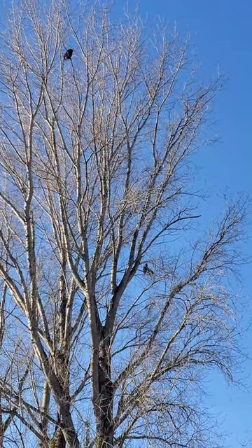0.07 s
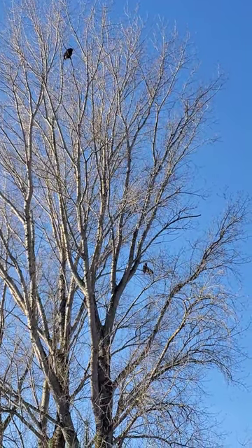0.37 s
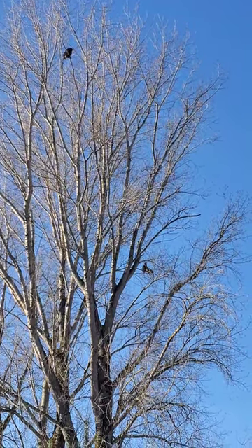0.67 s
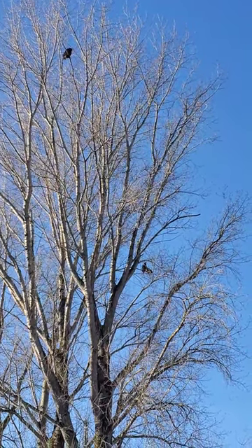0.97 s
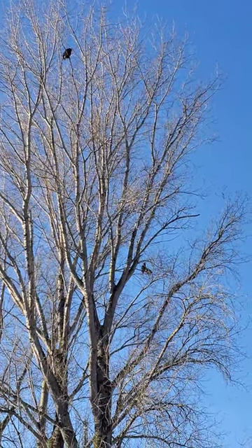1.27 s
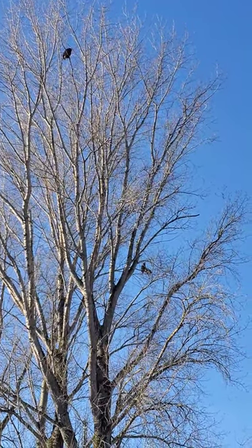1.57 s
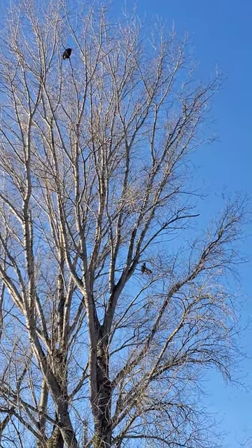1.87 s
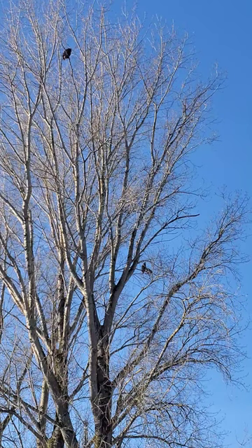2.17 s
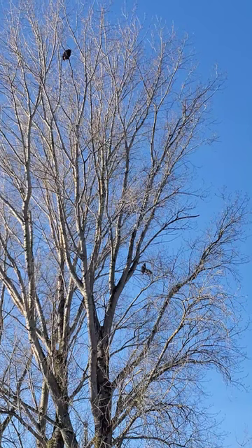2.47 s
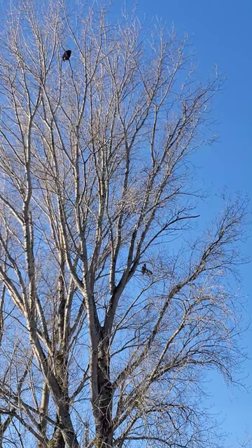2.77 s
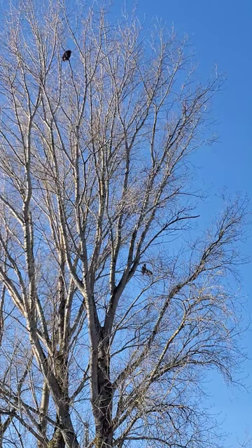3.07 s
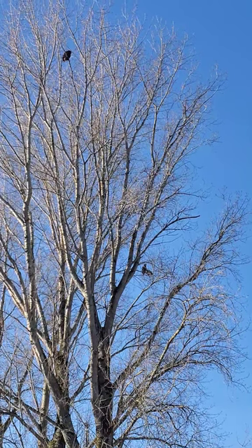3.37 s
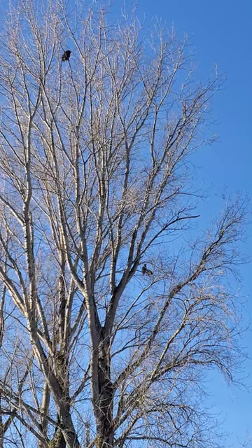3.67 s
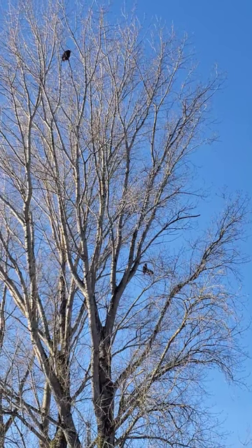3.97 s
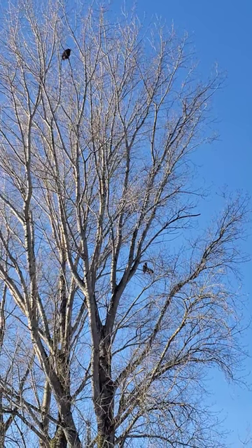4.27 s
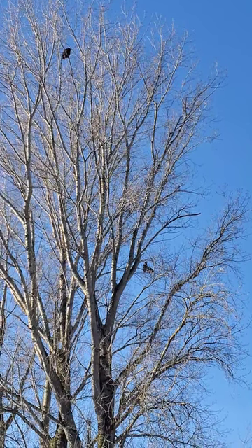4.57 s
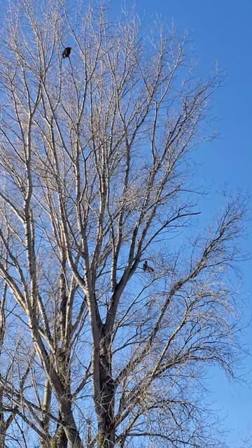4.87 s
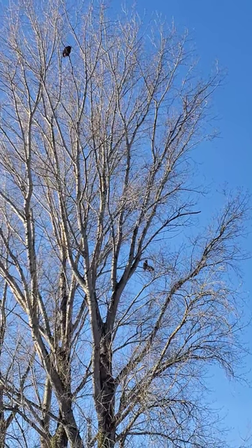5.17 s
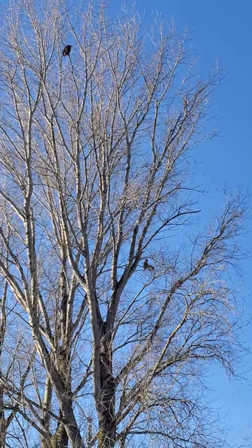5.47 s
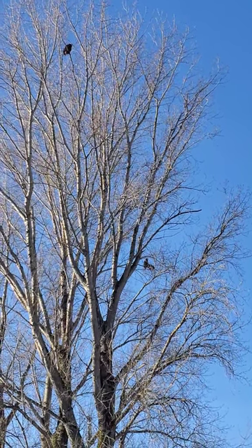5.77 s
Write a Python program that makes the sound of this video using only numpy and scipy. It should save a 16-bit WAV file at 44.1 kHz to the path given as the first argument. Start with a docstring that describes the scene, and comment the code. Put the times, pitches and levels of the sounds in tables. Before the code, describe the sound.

A distant road rumbles steadily outdoors. Faint birds in the trees give thin whistles and two rising, wheezy calls, then a high twitter. Small chirps cluster as the traffic swells slightly, followed by a third wheeze and more whistles and chirps. Near the end a fingertip suddenly bumps and brushes the microphone on the right, much louder than the birds, and one lower whistle follows.

```python
"""A distant road rumbles throughout, and bare winter trees scatter the calls of birds.
First come thin whistles and two rising, wheezy calls from the two sides of a bird's voice box,
then a high twitter. Small arched chirps crowd in as traffic swells past, near 2.6 s.
A third wheeze follows at 3.5 s, then more whistles and chirps. At 5.6 s a fingertip bumps
the camera and brushes across its right microphone opening; one lower whistle ends the scene."""
import sys
import numpy as np
from scipy import signal
from scipy.fft import rfft, irfft, next_fast_len
from scipy.io import wavfile
from scipy.ndimage import uniform_filter1d, map_coordinates

SR = 44100
rng = np.random.default_rng(int(sys.argv[2]) if len(sys.argv) > 2 else 0)


def inscribe(sig):
    """Save sig as 16-bit PCM at rate SR to the path in sys.argv[1].

    A 1-D sig is mono; a 2-D sig holds one channel per row.
    Samples are clipped to [-1, 1] before scaling.
    """
    pcm = np.round(np.clip(np.atleast_2d(sig).T, -1, 1) * 32767)
    wavfile.write(sys.argv[1], SR, pcm.astype(np.int16))


N = 261072

# Tone colour of the steady hiss of air and microphones: frequency_hz, relative_db
HISS_COLOUR = [(1500, -11), (3000, 3), (3800, 3), (4600, 3.5), (5700, 1), (6800, -11), (8200, -17),
               (9500, -7), (11000, -2), (15000, -4)]
# Tone colour of the deep engine rumble: frequency_hz, relative_db
RUMBLE_COLOUR = [(20, -22), (33, -11.5), (43, -5), (55, 0.5), (72, -0.5), (88, -1.5), (110, -8),
                 (145, -19.5), (220, -45), (500, -100)]
# Tone colour of the engine hum above it: frequency_hz, relative_db
HUM_COLOUR = [(80, -17), (135, 1.5), (195, 0), (240, -5.5), (310, -8.5), (450, -17.5), (750, -35.5),
              (2000, -92)]
# Tone colour of the tyre roar: frequency_hz, relative_db
TYRE_COLOUR = [(200, -6), (400, -1.5), (620, -2), (800, 1.5), (1050, 0.5), (1550, -4), (2000, -4.5),
               (2300, -11.5), (2650, -24), (3600, -39.5), (6000, -37.5)]
# Droning engine tones: pitch_hz, level_db
ENGINE_TONES = [(59, -57.5), (71, -53), (180, -65.5), (211, -71), (274, -79)]
# How alike left and right are in sound from all around: frequency_hz, likeness (-1 to 1)
STEREO_LIKENESS = [(60, 0.99), (130, 0.96), (290, 0.78), (640, 0.69), (1410, 0.36), (3100, -0.22),
                   (6820, -0.41), (15000, 0.55)]
# Tone colour of a blur of far-off songs: frequency_hz, relative_db
CHORUS_COLOUR = [(1500, -51.5), (2800, -9), (3250, 0), (3700, -11), (4600, -5.5), (5400, -14), (7000, -21),
                 (9000, -74)]
# How loud that blur is: time_s, level_db
CHORUS_LEVELS = [(0, -83.5), (1.6, -77.5), (2.3, -90), (3.4, -94), (4.15, -75), (4.7, -77.5), (5.1, -86),
                 (5.55, -76.5), (5.9, -93)]
# High twitter: first_note_s, last_note_s, first_pitch_hz, last_pitch_hz, level_db
TWITTER_PHRASES = [(1.355, 1.999, 6780, 5950, -84.5), (5.595, 5.74, 7650, 6740, -80.5)]
# Arched chirps: start_s, length_s, top_pitch_hz, top_place (0 to 1), level_db
CHIRP_NOTES = [(1.045, 0.031, 4240, .9, -76.5), (1.284, .022, 3250, 0, -67), (2.42, .022, 2920, .1, -79),
               (2.6, 0.0845, 2630, .62, -75), (2.785, .022, 3300, 1, -83), (2.8, 0.082, 2304, 0.5, -66.5),
               (2.872, 0.036, 3250, 0.05, -78.5), (3.048, 0.069, 3410, 0.48, -77),
               (3.05, .06, 2910, 0.1, -73), (4.505, 0.062, 2216, 0.38, -62), (4.745, 0.062, 3410, .5, -77),
               (5.485, 0.035, 4650, .4, -74.5), (5.565, 0.08, 4800, .3, -77)]
# Thin whistles: start_s, length_s, pitch_hz, level_db
WHISTLE_NOTES = [(.14, 0.28, 3400, -80), (.44, .11, 3300, -83), (.62, 0.34, 3285, -90),
                 (.96, .08, 3520, -79), (1.07, .19, 3510, -76), (1.36, 0.35, 3413, -77),
                 (1.87, 0.22, 3380, -89.5), (3.99, .15, 3220, -76), (4.2, .16, 3235, -74),
                 (5.768, 0.12, 1703, -63.5)]
# Wheezy calls: start_s, length_s, base_pitch_hz, rise_hz, half_rise_s, swell_s, fade_db_per_s, level_db
WHEEZE_CALLS = [(0.279, 0.38, 1083, 399, .165, 0.21, 26, -76),
                (1.101, .48, 1021, 376, .185, 0.16, 23, -66.5),
                (3.541, 0.564, 1008, 344, .26, .13, 17, -66.5)]
# Overtones of a wheeze: pitch_multiple, relative_db
WHEEZE_OVERTONES = [(2, -8), (3, 0), (4, -14)]
# Tone colour of the hoarse air in a wheeze: frequency_hz, relative_db
RASP_COLOUR = [(1500, -21), (2300, -9), (3000, 0.5), (4200, 2.5), (5200, -11.5), (6500, -20), (9000, -36)]
# Time the echo in the trees takes to fade by 60 dB: frequency_hz, fade_s
TREE_ECHO = [(300, .4), (3000, .42), (8000, .25)]
# How each microphone opening (port) colours outdoor sound: frequency_hz, left_db, right_db
PORT_COLOUR = [(1130, 0, 0), (1720, -0.5, 7), (1870, -11.5, 5), (2230, 1.5, -0.5), (2530, -0.5, 4),
               (3200, -2.5, 4), (3780, -1.5, -4), (4530, -6.5, 6), (5470, -0.5, 1), (8000, 0.5, 0)]
# Tone colour of skin rubbing dully: frequency_hz, relative_db
RUB_COLOUR = [(40, -6), (100, 2.5), (280, -3.5), (450, -4), (750, -4), (1500, -7), (2500, -11.5),
              (5500, -20), (7500, -43), (15000, -49)]
# Tone colour of skin scraping: frequency_hz, relative_db
SCRAPE_COLOUR = [(400, -13), (1500, -10.5), (2400, -5), (3100, -1), (4000, -5.5), (5200, -10.5),
                 (6500, -15.5), (8500, -26), (12500, -16), (15500, -24)]


def amp(db):
    """Turn decibels into a number to multiply by."""
    return 10 ** (np.asarray(db) / 20)


def unit(x):
    """Scale x to an average strength (rms) of 1."""
    return x / np.sqrt(np.mean(x ** 2) + 1e-20)


def along(points, hz):
    """Read between the rows of a (frequency_hz, value) table, on a log frequency scale."""
    frequencies, values = np.transpose(points)
    return np.interp(np.log(hz + 1), np.log(frequencies + 1), values)


def gate(start, end, fade):
    """On from start to end, with soft edges; all in seconds."""
    t = np.arange(N) / SR
    return np.clip(np.minimum(t - start, end - t) / fade + .5, 0, 1)


def swell(peak_s, rise_db_per_s, fall_db_per_s):
    """A level in dB that climbs to 0 at peak_s and falls again."""
    t = np.arange(N) / SR - peak_s
    return np.minimum(rise_db_per_s * t, -fall_db_per_s * t)


def wobble(rate):
    """A smooth curve through `rate` random values a second."""
    return map_coordinates(rng.standard_normal(int(N * rate / SR) + 4), [np.arange(N) * rate / SR])


def filtered(x, response):
    """Turn each frequency of x up or down by response(hz)."""
    size = next_fast_len(N + SR // 2)
    return irfft(rfft(x, size) * response(np.fft.rfftfreq(size, 1 / SR)), size)[..., :N]


def noise(colour):
    """Noise of strength 1 with the given tone colour."""
    return unit(filtered(rng.standard_normal(N), lambda hz: amp(along(colour, hz))))


def rush(colour, patchy_db):
    """Noise from all around, with drifting louder patches; left and right are most alike in the bass."""
    bands = signal.stft(rng.standard_normal((2, N)), nperseg=1024)[2]
    patches = uniform_filter1d(rng.standard_normal(bands.shape[1:]), size=8, axis=0)
    patches = uniform_filter1d(patches, size=14, axis=1)
    pair = signal.istft(bands * amp(patchy_db * unit(patches)), nperseg=1024)[1][:, :N]
    spread = lambda hz: np.arccos(np.clip(along(STEREO_LIKENESS, hz), -1, 1)) / 2
    mid, side = filtered(pair, lambda hz: amp(along(colour, hz)) * [np.cos(spread(hz)), np.sin(spread(hz))])
    return unit(np.array([mid + side, mid - side]))


def hiss():
    """The faint steady hiss on each side, from the open air and the microphones."""
    return amp(-79) * np.array([noise(HISS_COLOUR), noise(HISS_COLOUR)])


def drone():
    """Engine tones that drift in and out with the air."""
    t = np.arange(N) / SR
    out = np.zeros(N)
    for hz, db in ENGINE_TONES:
        drift = wobble(5.9) + 1j * wobble(5)  # moves both level and phase
        out += amp(db) * unit(np.real(drift * np.exp(2j * np.pi * hz * t)))
    return out


def road(pass_s=2.6, pass_width_s=1.06, pass_db=2):
    """Far engines rumble and hum; tyre roar, dulled by distance, swells once as traffic passes."""
    t = np.arange(N) / SR
    rumble = amp(-44.5 + 0.6 * wobble(5.61)) * rush(RUMBLE_COLOUR, patchy_db=.5)
    hum = amp(-59) * rush(HUM_COLOUR, patchy_db=1.5)
    tyre_db = -63.5 + pass_db * np.exp(-((t - pass_s) / pass_width_s) ** 2)
    return rumble + hum + drone() + amp(tyre_db) * rush(TYRE_COLOUR, patchy_db=1.65)


def chorus():
    """Far-off songs blur into a noise that comes and goes."""
    level_db = np.interp(np.arange(N) / SR, *np.transpose(CHORUS_LEVELS))
    return amp(level_db) * rush(CHORUS_COLOUR, patchy_db=1)


def notes(rows, glide, jitter, flutter_db):
    """Pure bird notes: glide bends the pitch, jitter shakes it, flutter shakes the level."""
    out = np.zeros(N + SR)
    waver = 1 + jitter * wobble(200)
    flutter = amp(flutter_db * wobble(45))
    for start_s, length_s, hz, *shape, db in rows:
        progress = np.linspace(0, 1, int(length_s * SR))
        span = round(start_s * SR) + np.arange(len(progress))
        pitch = hz * glide(progress, length_s, *shape) * waver.take(span, mode="clip")
        loudness = np.sqrt(2 * np.abs(np.sin(np.pi * progress)))
        out[span] += amp(db) * loudness * np.sin(2 * np.pi * np.cumsum(pitch) / SR)
    return out[:N] * flutter


def arch(depth=0.167):
    """A glide that bends down on both sides of its top, by up to `depth` of the pitch."""
    return lambda progress, length_s, top: 1 - depth * ((progress - top) / max(top, 1 - top)) ** 2


def chatter(start_s=2.52, end_s=3.18, note_s=.04, pitch_hz=2640, level_db=-82.5, count=9):
    """Faint, farther chirps fill the busiest stretch at random."""
    rows = [(start_s + when * (end_s - start_s), note_s, pitch_hz * (1 + .244 * (high - .5)), top, level_db)
            for when, high, top in rng.random((count, 3))]
    return notes(rows, arch(), jitter=.02, flutter_db=2)


def twitter(gap_s=.09, slip_s=.018, note_s=.055):
    """Quick, high, loosely timed notes; each phrase holds its pitch, then drops."""
    rows = []
    for first_s, last_s, first_hz, last_hz, db in TWITTER_PHRASES:
        for progress in np.linspace(0, 1, round((last_s - first_s) / gap_s) + 1):
            late, high, loud = rng.standard_normal(3)
            start_s = first_s + progress * (last_s - first_s) + slip_s * late
            hz = (first_hz + (last_hz - first_hz) * progress ** 3) * (1 + .012 * high)
            rows.append((start_s, note_s, hz, rng.random(), db + 1.5 * loud))
    return notes(rows, arch(depth=.035), jitter=.016, flutter_db=2)


def chirps():
    """Short notes whose pitch bends in an arch."""
    return notes(CHIRP_NOTES, arch(), jitter=.011, flutter_db=1.5)


def whistles(sag_per_s=0.11):
    """Thin, nearly level notes that lose a small share of their pitch as they go."""
    sag = lambda progress, length_s: 1 - sag_per_s * length_s * (progress - .5)
    return notes(WHISTLE_NOTES, sag, jitter=.0035, flutter_db=1.5)


def wheezes():
    """Both sides of a bird's voice box rise in pitch together, a little apart, with hoarse air."""
    jitter, split = .0055, .055  # shares of the pitch
    swell_db, flutter_db, roughness_db, rasp_db, second_side_db = 12, 2, -6.5, -10, -5.5
    clearest_at, fray_db = .42, 9  # clearest partway through, hoarsest at the end
    out = np.zeros(N)
    for start_s, length_s, base_hz, rise_hz, half_rise_s, swell_s, fade_db_per_s, db in WHEEZE_CALLS:
        t = np.clip(np.arange(N) / SR - start_s, 0, length_s)
        pitch = base_hz + rise_hz * t ** 3 / (t ** 3 + half_rise_s ** 3)
        level_db = db + swell(start_s + swell_s, swell_db / swell_s, fade_db_per_s)
        hoarse_db = fray_db * ((t / length_s - clearest_at) / (1 - clearest_at)) ** 2
        voice = amp(rasp_db + hoarse_db) * noise(RASP_COLOUR)
        second_pitch = pitch * (1 + split * np.tanh(2 * wobble(7)))
        for side_hz, side_db in ((pitch, 0), (second_pitch, second_side_db + hoarse_db / 2)):
            waver = 1 + jitter * amp(hoarse_db) * wobble(220)
            phase = 2 * np.pi * np.cumsum(side_hz * waver) / SR
            for multiple, overtone_db in WHEEZE_OVERTONES:
                roughness = 1 + amp(roughness_db) * wobble(600)
                voice += amp(side_db + overtone_db) * np.sin(multiple * phase) * roughness
        loudness = amp(level_db + flutter_db * wobble(70))
        out += gate(start_s, start_s + length_s, fade=0.032) * loudness * voice
    return out


def among_trees(x, echo_db, left_db):
    """The direct sound plus its scatter from trunks and branches, different on each side."""
    hz, t, bands = signal.stft(rng.standard_normal((2, SR)), SR, nperseg=256)
    fading = amp(-60 * t / along(TREE_ECHO, hz)[:, None])
    echo = signal.istft(bands * fading, SR, nperseg=256)[1]
    scatter = signal.fftconvolve(x[None], echo / np.linalg.norm(echo[0]), axes=1)[:, :N]
    return x * amp([[left_db / 2], [-left_db / 2]]) + amp(echo_db) * scatter


def birds():
    """The farther the singer, the more of its sound arrives scattered."""
    return (among_trees(wheezes(), echo_db=-2, left_db=-1)
            + among_trees(whistles(), echo_db=-8, left_db=2)
            + among_trees(chirps(), echo_db=-5, left_db=1)
            + among_trees(chatter(), echo_db=3, left_db=0)
            + among_trees(twitter(), echo_db=0, left_db=6)
            + chorus())


def finger(touch_s=5.6237, lift_s=5.7215, push_hz=80, push_fade_s=.045, bump_rise_s=.001, left_db=-42):
    """A soft bump, then skin rubs over the right port, dull at first and scraping as it speeds up."""
    grip = amp(0.86 * wobble(700))  # the skin sticks and slips
    rub = amp(-23.5 + swell(5.652, rise_db_per_s=378, fall_db_per_s=308)) * noise(RUB_COLOUR)
    scrape = amp(-23 + swell(5.664, rise_db_per_s=650, fall_db_per_s=228)) * noise(SCRAPE_COLOUR)
    stroke = gate(touch_s, lift_s, fade=0.0058) * grip * (rub + scrape)
    faint_hiss = amp(-68 + swell(lift_s, rise_db_per_s=1000, fall_db_per_s=90)) * noise(SCRAPE_COLOUR)
    t = np.maximum(np.arange(N) / SR - touch_s, 0)
    push = amp(-19 - 60 * t / push_fade_s) * np.sin(2 * np.pi * push_hz * t)  # air squeezed into the port
    bump = amp(-22) * t / bump_rise_s * np.exp(1 - t / bump_rise_s) * noise(RUB_COLOUR)
    return (stroke + faint_hiss + push + bump) * amp([[left_db], [0]])


def ports(x):
    """Each microphone opening rings at some frequencies and dulls others."""
    table = np.array(PORT_COLOUR)
    return filtered(x, lambda hz: amp([along(table[:, [0, side]], hz) for side in (1, 2)]))


def scene():
    """Road and birds reach two unequally coloured ports; the finger touches one of them."""
    return ports(road() + birds() + hiss()) + finger()


def record(dry):
    """The camera cuts off the very highest treble."""
    top_hz, fade_hz = 15550, 400
    return filtered(dry, lambda hz: np.clip((top_hz - hz) / fade_hz + .5, 0, 1))


dry = scene()
out = record(dry)
inscribe(out)
```